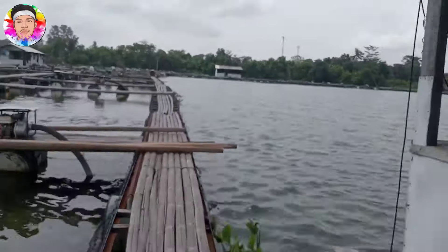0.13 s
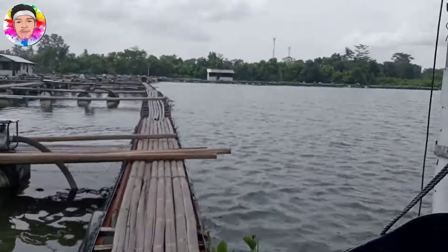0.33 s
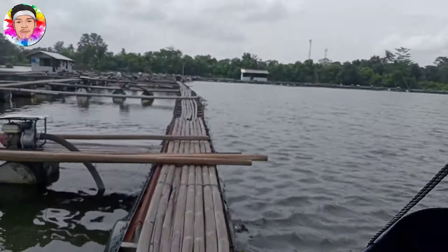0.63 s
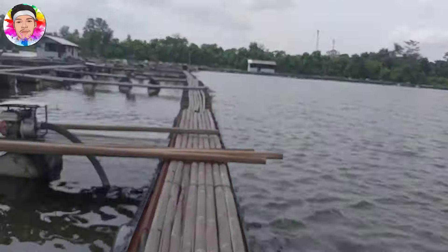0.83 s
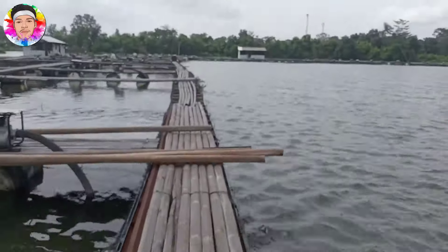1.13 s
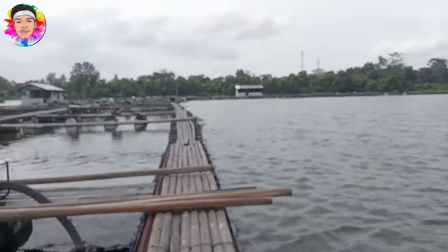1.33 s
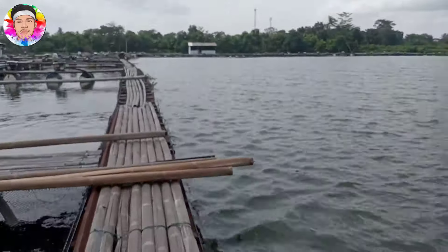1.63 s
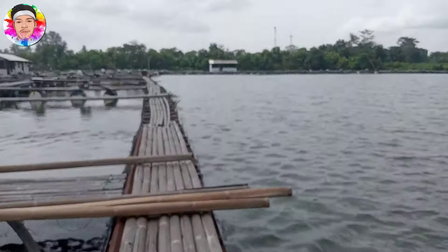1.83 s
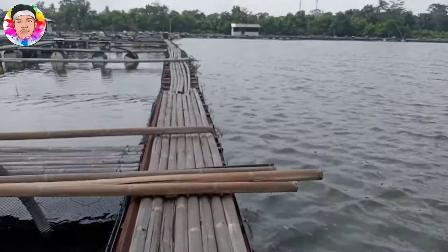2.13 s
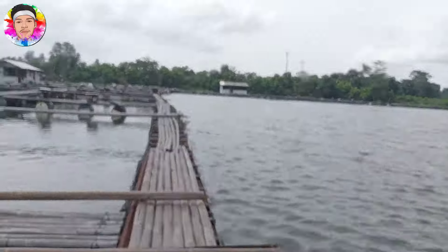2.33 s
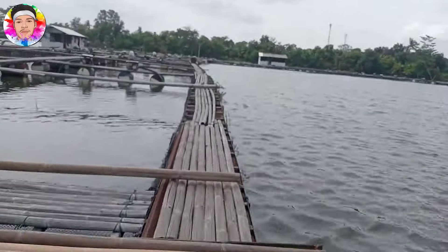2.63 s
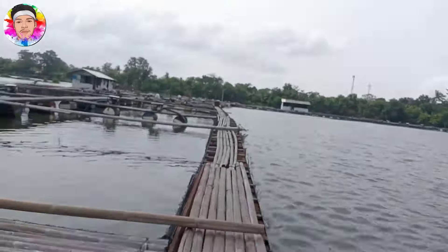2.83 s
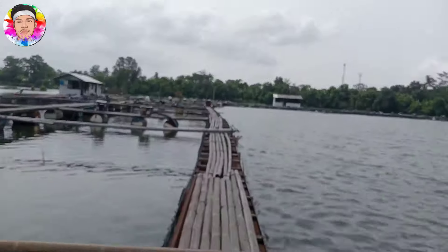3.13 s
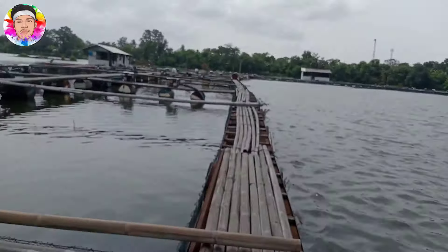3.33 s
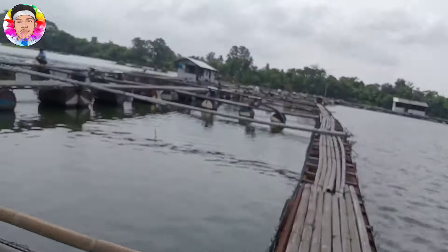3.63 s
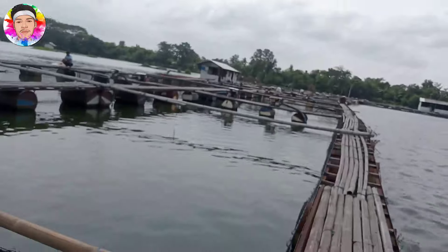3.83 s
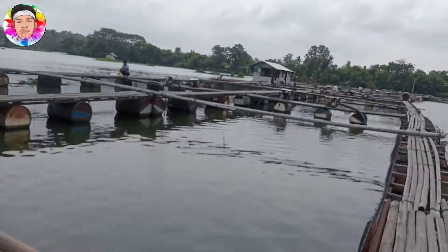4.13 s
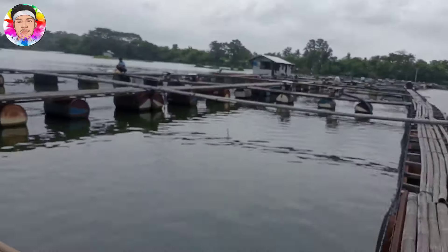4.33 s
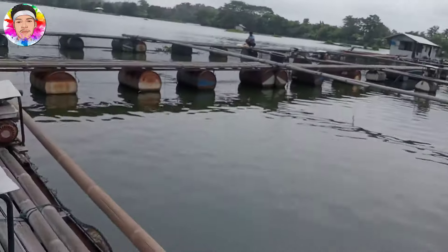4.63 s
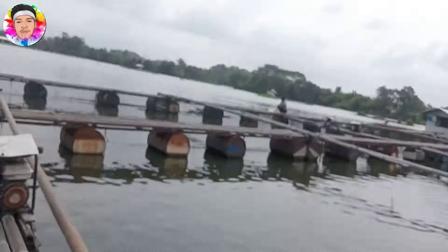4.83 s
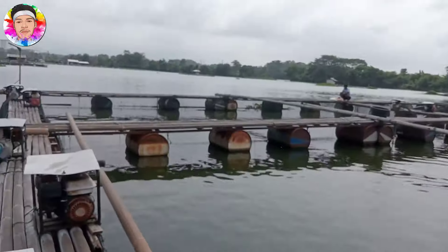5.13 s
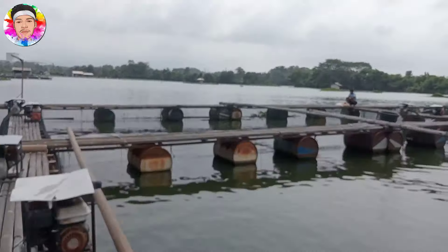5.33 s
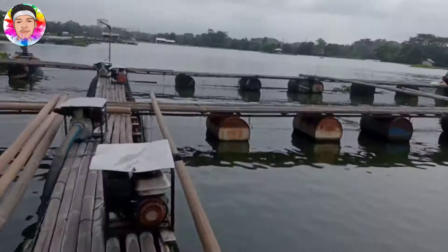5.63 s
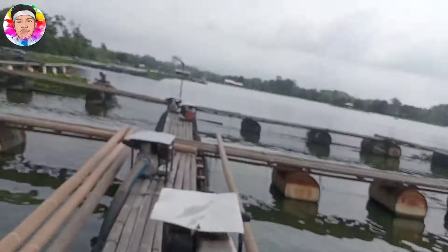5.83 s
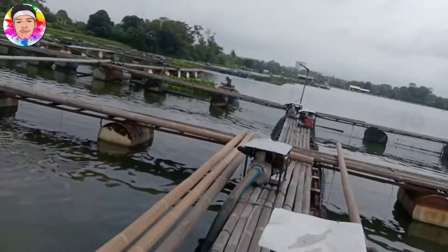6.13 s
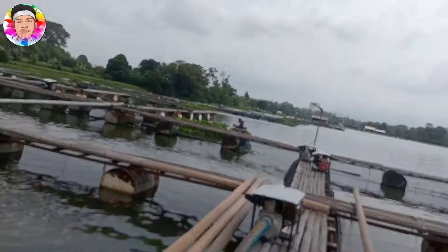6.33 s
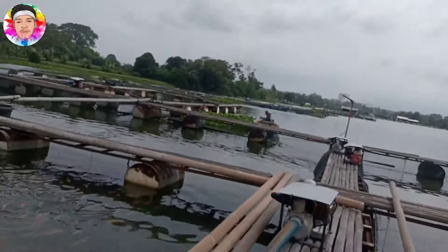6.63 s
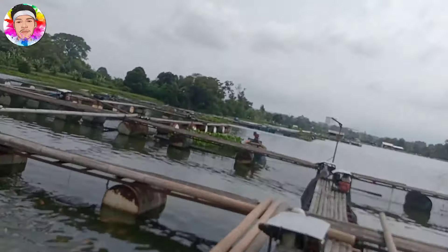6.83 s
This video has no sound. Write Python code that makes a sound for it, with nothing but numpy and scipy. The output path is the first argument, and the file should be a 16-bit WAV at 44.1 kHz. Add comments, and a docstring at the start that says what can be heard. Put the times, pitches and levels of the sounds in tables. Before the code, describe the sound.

Loose bamboo slats clatter under walking feet on an open lake, heard close and dry with no room echo. Each stride is a cluster of short hollow knocks with rubbing, crackling fibres and occasional sharp snaps or tiny squeaks. Low wind buffets the microphone, and a soft two-tone hum swells faintly around three to four seconds. Steps peak midway through, then become lighter and sparser until the end.

```python
"""A walk along a floating walkway of loose bamboo slats on a lake, about 7 s.
From the start footfalls clatter slats, soles scuff, dry canes snap, the deck rattles and rubs, and now and
then a cane squeaks: ringing contacts, grit, dispersed clicks and noise bursts. Wind buffets the microphone
and the lake washes softly: shaped noise. Hard steps land near 1 s; from 2.6 s a lashing creaks in stick-slip
pulses, from 2.9 to 3.9 s a low two-tone drone sounds, and near 4.5 s come the loudest knocks."""
import sys
import numpy as np
from scipy import signal
from scipy.fft import rfft, irfft, next_fast_len
from scipy.io import wavfile
from scipy.ndimage import uniform_filter1d, map_coordinates

SR = 44100
rng = np.random.default_rng(int(sys.argv[2]) if len(sys.argv) > 2 else 0)


def transcribe(signal):
    """Save signal, clipped to [-1, 1], as a 16-bit WAV file at the path in sys.argv[1]."""
    frames = np.atleast_2d(signal).T
    limited = np.clip(frames, -1, 1)
    pcm = np.round(limited * 32767).astype(np.int16)
    wavfile.write(sys.argv[1], SR, pcm)


N = 308567

# relative spectrum of knocking slats: [f/Hz, density/dB]
SLAT_SPECTRUM = [(60, -30.5), (150, -1.5), (300, -0.5), (500, -2), (780, 0), (1000, -3), (1300, -3.5),
                 (2000, -36), (4000, -33.5), (8000, -77)]


def footfalls(pitch_spread=0.34, cycles=1.44, scatter_db=2, scrape_trim_db=-1,
              rise_power=1.3, fall_power=0.89, firm_db=1, count=80):
    """Each blow passes from slat to slat, a contact every few ms, while the sole scrapes the canes."""
    # slats knocked underfoot: [peak t/s, level/dB, rise/s, fall/s, f/Hz, scrape re knock before trim/dB]
    knock_rows = [(0.08, -15.5, 0.009, 0.013, 498, -25), (0.2, -20.5, 0.012, 0.021, 474, -12),
                  (0.257, -18, 0.024, 0.025, 278, -13.5), (0.345, -22.5, 0.0037, 0.014, 620, -15.5),
                  (0.518, -16.5, .005, 0.084, 515, -12), (0.612, -12, 0.011, 0.012, 540, -12.5),
                  (0.962, -7, 0.0053, 0.0095, 500, -14), (0.98, -4.5, 0.0076, 0.017, 387, -24.5),
                  (1.033, -14.5, 0.013, 0.016, 448, -16.5), (1.176, -22, .01, .035, 450, -19),
                  (1.434, -8.5, 0.0074, 0.036, 414, -16.5), (1.863, -16.5, .003, 0.0075, 350, -21),
                  (1.9, -18.5, .004, 0.057, 456, -7), (1.942, -10, 0.014, 0.023, 418, -29.5),
                  (2.401, -16, 0.012, 0.016, 425, -25.5), (2.57, -15.5, .001, 0.026, 426, -13.5),
                  (2.702, -19.5, 0.0022, 0.0054, 336, -20), (2.842, -8, 0.014, 0.011, 482, -22.5),
                  (3.227, -21, 0.0036, 0.038, 580, -6), (3.289, -8.5, 0.0092, 0.012, 542, -12.5),
                  (3.325, -15.5, 0.016, 0.0056, 495, -25), (3.365, -18.5, 0.0019, 0.013, 836, -16),
                  (3.382, -14.5, 0.0071, 0.025, 502, -18), (3.519, -25, 0.021, 0.016, 330, -10.5),
                  (3.818, -17.5, 0.022, 0.012, 526, -14.5), (3.857, -11, 0.0052, 0.0077, 395, -22.5),
                  (3.913, -18.5, 0.003, 0.013, 467, -15), (3.967, -22, 0.0026, 0.026, 508, -16),
                  (4.236, -22.5, 0.0071, 0.0078, 497, -12.5), (4.32, -16.5, 0.022, 0.03, 510, -20.5),
                  (4.391, -13, 0.0026, 0.003, 480, -23), (4.468, -13.5, .003, 0.018, 540, -11),
                  (4.503, -3, 0.005, 0.0031, 300, -20), (4.509, -5, .0025, 0.0058, 723, -24),
                  (4.586, -24, 0.0034, 0.014, 462, -44), (4.813, -13, 0.0013, 0.0062, 720, -53),
                  (4.854, -24.5, 0.0075, 0.0091, 520, -8), (4.879, -26, 0.016, .008, 734, -9.5),
                  (5.03, -16.5, 0.011, 0.0028, 670, -16.5), (5.456, -28, 0.0042, 0.0071, 630, -5),
                  (5.575, -21.5, 0.024, 0.014, 391, -20), (5.931, -13, 0.003, 0.035, 559, -15.5),
                  (6.011, -19.5, 0.011, 0.022, 304, -11), (6.084, -22, .005, 0.0061, 630, -31),
                  (6.416, -16.5, 0.007, 0.031, 361, -28), (6.476, -23.5, 0.01, .022, 344, -21.5),
                  (6.597, -21.5, 0.015, .035, 412, -14)]
    wood, scrape_power = np.zeros(N), np.zeros(N)
    lead_s, length_s = 0.06, 0.18
    t = np.arange(round(length_s * SR)) / SR - lead_s
    for peak_s, db, rise_s, fall_s, hz, sole_db in knock_rows:

        def load(t):
            """Foot load, 1 at t = 0, with stretched-exponential flanks."""
            rising = np.abs(t / rise_s) ** rise_power
            falling = np.abs(t / fall_s) ** fall_power
            return np.exp(-np.where(t < 0, rising, falling))

        at = (np.arange(count) + rng.uniform(-0.55, 0.65, count)) * length_s / count - lead_s
        pitch = hz * np.exp(pitch_spread * np.clip(rng.standard_normal(count), -2, 1.5))
        signs = rng.choice([-1, 1], count)
        sizes = load(at) * amp(scatter_db * rng.standard_normal(count)) * signs
        # the slat right under the foot takes a firm contact
        main = np.abs(at).argmin()
        at[main], pitch[main], sizes[main] = 0, hz, amp(firm_db)
        # low slats ring longer, so for the same energy they swing less
        clatter = rings(len(t), at + lead_s - 1 / pitch, pitch, sizes * np.sqrt(pitch), cycles)
        load_rms = np.sqrt(np.mean(load(t) ** 2))
        add(wood, peak_s - lead_s, amp(db) * load_rms * coloured(clatter, SLAT_SPECTRUM))
        scrape = amp(db + sole_db + scrape_trim_db) * load(t)
        add(scrape_power, peak_s - lead_s, scrape ** 2)
    sole = grit(noise_db=-1, scatter_db=4, cycles=2.2)
    return wood + np.sqrt(scrape_power) * sole


def snaps(width=0.54, splinter=0.86, size=2048):
    """A cane cracks; bending waves carry highs ahead of lows, so the click is a very short falling chirp."""
    # snaps: [t/s, level as rms over 4 ms/dB, dispersion spread/s]
    snap_rows = [(0.0757, -24.5, .0024), (0.1182, -25.5, .0005), (0.9574, -22, 0.0023),
                 (1.031, -32.5, .0013), (1.5296, -23.5, .0005), (2.6987, -33, 0.00064),
                 (2.9133, -32.5, .0012), (2.9242, -37, 0.0011), (2.942, -26.5, .0013), (3.033, -35, .0007),
                 (3.2763, -22.5, .0016), (3.378, -23.5, .0014), (3.4063, -16, .0018),
                 (3.7773, -35.5, 0.00033), (3.91, -27.5, .0022), (3.9664, -38, 0.0023),
                 (4.3785, -28, .0009), (4.3915, -18, .002), (4.4267, -22.5, .0005), (4.4657, -27.5, .0016),
                 (4.483, -25, .0009), (4.5089, -25.5, .001), (4.5472, -26, .0005), (5.2202, -39, .0015),
                 (5.5484, -36.5, .0006), (5.9296, -30.5, .0021), (6.0223, -26.5, .0009),
                 (6.1883, -35, .001), (6.5336, -33.5, 0.0013)]
    # relative cane response: [f/Hz, gain/dB]
    cane_response = [(300, -32), (900, 3.5), (2000, -0.5), (3200, -4.5), (4400, 0.5), (5500, -11.5),
                     (6800, -17), (8000, -25), (10000, -14), (15500, -12)]
    ref_hz, ref_spread_s, drop_power = 2098, 0.00075, 0.16  # longer snaps are lower
    lead_s, level_span_s, splinter_span = 0.01, 0.004, 1.3
    out = np.zeros(N)
    f = np.fft.rfftfreq(size, 1 / SR) + 1
    t = np.arange(size) / SR
    for snap_s, db, spread_s in snap_rows:
        hz = ref_hz * (ref_spread_s / spread_s) ** drop_power
        life_s = splinter_span * spread_s + 1 / SR
        fibres = rng.standard_normal(size) * np.exp(-t / life_s)
        source = splinter * fibres / np.sqrt(life_s * SR / 2)
        source[0] = 1  # the break itself, ahead of the splintering fibres
        band = gain(cane_response, f) * np.exp(-0.5 * (np.log(f / hz) / width) ** 2)
        delay_phase = 2 * np.pi * (f * lead_s + 2 * spread_s * (2 * np.sqrt(f * hz) - f))
        click = irfft(rfft(source) * band * np.exp(-1j * delay_phase))
        level = amp(db) * np.sqrt(level_span_s * SR)
        add(out, snap_s - lead_s, level * click / np.linalg.norm(click))
    return out


def deck(rattle_hz=470, pitch_spread=0.4485, cycles=3.74, scatter_db=2.5, uneven_db=2, count=3200):
    """With every stride the loose slats jostle and the lashed canes rub and crackle."""
    # walker's weight comes on: [t/s, rattle level/dB, scuff level/dB, length re usual stride]
    stride_rows = [(0.23, -37, -46.5, 2.7), (0.6, -27, -39.5, 1.23), (1.1, -22, -39, 1.15),
                   (1.521, -30, -42, 1.7), (2.03, -33, -44, 3.9), (2.518, -28.5, -39.5, 3.4),
                   (2.899, -27.5, -38, 1.3), (3.35, -30.5, -42, 1.7), (3.771, -26, -38, 0.82),
                   (4.001, -33.5, -40.5, 0.88), (4.398, -18, -33, 0.55), (5.038, -21.5, -39.5, 0.76),
                   (5.601, -27.5, -49, 1), (6.13, -24, -38, 0.33), (6.56, -32, -47, 2.4)]
    load_db_per_s, settle_db_per_s = 90, 71.5
    grip_db_per_s, release_db_per_s = 56.5, 64.5
    idle_rattle_db, idle_rub_db = -44, -64  # the floating deck never lies quite still
    stride_s, rattle_db, scuff_db, lengths = np.transpose(stride_rows)
    jostling = swells(stride_s, rattle_db, load_db_per_s, settle_db_per_s, lengths)
    jostling = np.hypot(amp(idle_rattle_db), jostling)
    rubbing = swells(stride_s, scuff_db, grip_db_per_s, release_db_per_s, lengths)
    rubbing = np.hypot(amp(idle_rub_db), rubbing)

    at = rng.uniform(0, N / SR, count)
    pitch = rattle_hz * np.exp(pitch_spread * rng.standard_normal(count))
    sizes = amp(scatter_db * rng.standard_normal(count)) * rng.choice([-1, 1], count)
    contacts = coloured(rings(N, at, pitch, sizes, cycles), SLAT_SPECTRUM)
    rattle = unit(contacts * amp(uneven_db * wobble(28)))
    rub = unit(grit(noise_db=1.5, scatter_db=6.0, cycles=8.4) * amp(4.7 * wobble(45)))
    return jostling * rattle + rubbing * (rub + crackle())


def grit(noise_db, scatter_db, cycles, count=5000):
    """Dry friction: tiny slips, each ringing a cane at its own pitch, over an uneven hiss."""
    # relative scuff spectrum: [f/Hz, density/dB]
    scuff_spectrum = [(400, -23), (900, 4.5), (1300, -1), (1850, -1.5), (2500, -8.5), (3100, -12),
                      (3900, -10), (4500, -16.5), (5300, -27), (6500, -31), (7800, -41.5), (9500, -37.5),
                      (12000, -45), (15500, -57.5)]
    pitch = rng.uniform(800, 5200, count)
    sizes = amp(scatter_db * np.clip(rng.standard_normal(count), -2, 2)) * pitch ** 0.7
    slips = rings(N, rng.uniform(0, N / SR, count), pitch, sizes, cycles, size=700)
    hiss = rng.standard_normal(N) * amp(0.85 * wobble(210))
    mix = coloured(slips, scuff_spectrum) + amp(noise_db) * coloured(hiss, scuff_spectrum)
    return patchy(mix, depth_db=3.5)


def crackle(level_db=-18, scatter_db=4.5, count=420):
    """Dry fibres tick at random as the canes rub; level is relative to the rub."""
    # relative crackle spectrum: [f/Hz, density/dB]
    crackle_spectrum = [(1000, -11), (2500, 14), (4500, 6.5), (6000, -1), (7800, -13), (9500, -11),
                        (12500, -12), (15500, -6)]
    sizes = amp(scatter_db * np.clip(rng.standard_normal(count), -2, 2))
    train = pulses(rng.uniform(0, N / SR, count), sizes)
    return amp(level_db) * coloured(train, crackle_spectrum)


def squeaks(flutter_db=3, width=0.11):
    """A cane sliding on its neighbour sings briefly and unsteadily in a narrow band."""
    # squeaks: [centre t/s, level before flutter/dB, half length/s, f/Hz]
    squeak_rows = [(0.347, -38.5, 0.005, 2030), (0.76, -52, 0.073, 3600), (1.422, -34.5, .0065, 1970),
                   (2.122, -39, 0.013, 2220), (3.912, -19, 0.0014, 1890), (4.319, -24, 0.0019, 1900),
                   (4.502, -35, 0.0023, 1100), (5.805, -36, 0.0071, 1850), (5.934, -34, 0.0082, 2090),
                   (6.76, -47, .009, 2420)]
    out = np.zeros(N)
    for centre_s, db, half_s, hz in squeak_rows:
        sound = burst(half_s, hz, width)
        add(out, centre_s - len(sound) / SR / 2, amp(db) * sound)
    return out * unit(amp(flutter_db * wobble(70)))


def creak(slips_per_s=75, count=640):
    """A lashing sticks and slips at an uneven rate whenever it is pulled."""
    # pulls: [t/s, level/dB, length re usual pull]
    pull_rows = [(2.611, -46, 1), (2.71, -39, .7), (2.914, -42, .6)]
    # relative spectrum of one slip: [f/Hz, density/dB]
    slip_spectrum = [(800, -21), (2000, -5), (2800, -14.5), (3700, -0.5), (4600, -13.5), (5600, -20),
                     (7500, -37), (10000, -35), (15500, -35)]
    tighten_db_per_s, slacken_db_per_s = 319, 195
    uneven, scatter_db = 0.25, 4
    at = np.cumsum(np.exp(uneven * rng.standard_normal(count))) / slips_per_s
    sizes = amp(scatter_db * np.clip(rng.standard_normal(count), -2, 2))
    train = coloured(pulses(at, sizes), slip_spectrum)
    pull_s, db, lengths = np.transpose(pull_rows)
    return swells(pull_s, db, tighten_db_per_s, slacken_db_per_s, lengths) * train


def ticks(life_s=0.001, size=256):
    """Tiny bright ticks, some the sharp top of a cane snap: white noise with a 1 ms exponential decay."""
    # ticks: [t/s, onset level/dB]
    tick_rows = [(1.46, -51.5), (3.035, -47.5), (3.521, -49), (4.024, -43), (4.39, -50), (4.509, -49),
                 (4.872, -50), (6.023, -39), (6.924, -45.5)]
    decay = np.exp(-np.arange(size) / SR / life_s)
    out = np.zeros(N)
    for tick_s, db in tick_rows:
        add(out, tick_s, amp(db) * rng.standard_normal(size) * decay)
    return out


def wind(trim_db=0.9, lumpy_db=3, buffet_trim_db=-1, width=0.47):
    """Turbulence rumbles on the microphone; single eddies thump it."""
    # rumble: [t/s, level before trim/dB]
    wind_rows = [(0, -29.5), (0.74, -24.5), (0.9, -30), (1.6, -25), (1.8, -30), (2.1, -30), (2.95, -29.5),
                 (3.12, -46), (3.27, -34), (3.9, -31), (4.46, -25), (4.7, -30), (5.1, -29.5), (5.36, -34.5),
                 (5.53, -26), (6.15, -30.5), (6.6, -27), (6.9, -35.5)]
    # relative rumble spectrum: [f/Hz, density/dB]
    rumble_spectrum = [(15, -42), (30, -27), (50, -12), (75, -1.5), (120, 1), (180, -3), (260, -11.5),
                       (450, -21), (900, -34), (2000, -65.5), (5000, -100)]
    # eddies: [centre t/s, level before trim/dB, half length/s, f/Hz]
    buffet_rows = [(0.687, -19, 0.034, 119), (0.765, -17, .032, 123), (1.09, -18.5, 0.016, 122),
                   (2.092, -18.5, 0.016, 159), (2.58, -18.5, .015, 134), (2.831, -21, 0.017, 115),
                   (4.181, -26, 0.019, 152), (4.425, -18, 0.04, 130), (4.779, -27, 0.0099, 123),
                   (5.179, -14.5, 0.0042, 133), (5.568, -12.5, 0.018, 107), (5.846, -21, 0.024, 148),
                   (5.957, -11, 0.006, 145), (6.28, -16, 0.0075, 131), (6.59, -21.5, 0.08, 100)]
    rumble = coloured(rng.standard_normal(N), rumble_spectrum)
    rumble = unit(rumble * amp(lumpy_db * wobble(22)))
    out = amp(curves(wind_rows)[0] + trim_db) * rumble
    for centre_s, db, half_s, hz in buffet_rows:
        eddy = burst(half_s, hz, width)
        add(out, centre_s - len(eddy) / SR / 2, amp(db + buffet_trim_db) * eddy)
    return out


def drone(waver=0.017, flutter_db=3):
    """Two low, slightly unsteady sine tones swell and fade."""
    # envelope, silent outside: [t/s, level/dB]
    drone_rows = [(2.88, -49), (2.98, -33), (3.15, -42), (3.32, -40.5), (3.47, -31), (3.73, -34),
                  (3.92, -51)]
    # tones: [mean f/Hz, level re envelope before flutter/dB]
    tone_rows = [(116, 3.7), (178, 1.5)]
    tones = np.zeros(N)
    for hz, db in tone_rows:
        phase = 2 * np.pi * np.cumsum(hz * (1 + waver * wobble(13))) / SR
        tones += amp(db + flutter_db * wobble(11)) * np.sin(phase)
    level_db = np.interp(np.arange(N) / SR, *np.transpose(drone_rows), left=-np.inf, right=-np.inf)
    level = uniform_filter1d(amp(level_db), size=1024)
    return level * np.sqrt(2) * tones


def lake(level_db=-50.0):
    """The soft, uneven wash of ripples and open air: shaped noise with a wandering level."""
    # relative wash spectrum: [f/Hz, density/dB]
    air_spectrum = [(100, -23), (400, -2), (1000, -1), (2000, -11), (4000, -15), (5500, -29.5),
                    (7500, -42.5), (15500, -45.5)]
    lapping_db = 1.5 * wobble(12)
    return amp(level_db + lapping_db) * coloured(rng.standard_normal(N), air_spectrum)


def amp(db):
    """dB to amplitude."""
    return 10 ** (np.asarray(db) / 20)


def unit(x):
    """x at rms 1."""
    return x / np.sqrt(np.mean(x ** 2) + 1e-20)


def gain(points, hz):
    """Gain of (Hz, dB) points on a log axis."""
    f, db = np.transpose(points)
    return amp(np.interp(np.log(hz + 1), np.log(f + 1), db))


def curves(rows):
    """One value per sample for each column after the time."""
    s, *cols = np.transpose(rows)
    return [np.interp(np.arange(N) / SR, s, c) for c in cols]


def wobble(knots_per_s):
    """A smooth random curve through normally distributed knots."""
    return map_coordinates(rng.standard_normal(2048), [np.arange(N) * knots_per_s / SR], mode="wrap")


def filtered(x, response):
    """x times a response of frequency."""
    m = next_fast_len(len(x) + 4096)
    return irfft(rfft(x, m) * response(np.fft.rfftfreq(m, 1 / SR)), m)[:len(x)]


def coloured(x, points):
    """x shaped by (Hz, dB) points, at rms 1."""
    return unit(filtered(x, lambda hz: gain(points, hz)))


def add(track, s, sound):
    """Mix a sound into the track from time s, cropped to the track."""
    i = round(s * SR)
    part = sound[max(-i, 0):max(len(track) - i, 0)]
    track[max(i, 0):][:len(part)] += part


def rings(n, at, hz, sizes, cycles, attack=0.18, size=1200):
    """n samples of contacts: sines that rise within a cycle and decay over the given cycles."""
    t = np.arange(size) / SR
    turns = t * hz[:, None]
    envelope = (1 - np.exp(-turns / attack)) ** 2 * np.exp(-turns / cycles)
    waves = sizes[:, None] * envelope * np.sin(2 * np.pi * turns)
    index = np.maximum(at * SR, 0).astype(int)[:, None] + np.arange(size)
    return np.bincount(index.ravel(), waves.ravel(), n)[:n]


def pulses(at, sizes):
    """Single-sample impulses at the given times."""
    return np.bincount(np.clip(at * SR, 0, N).astype(int), sizes, N + 1)[:N]


def burst(half_s, hz, width, size=32768):
    """A Gaussian swell of narrow noise around hz, centred in its window, with rms about 1 at its crest."""
    swell = np.exp(-0.5 * ((np.arange(size) - size / 2) / SR / half_s) ** 2)
    noise = rng.standard_normal(size)
    band = filtered(noise, lambda f: np.exp(-0.5 * (np.log((f + 1) / hz) / width) ** 2))
    return np.sqrt(np.mean(swell ** 2)) * unit(band * swell)


def patchy(x, depth_db, size=512):
    """Shifting contacts favour ever new bands: random gain patches some 260 Hz wide and 30 ms long."""
    z = signal.stft(x, nperseg=size)[2]
    field = uniform_filter1d(rng.standard_normal(z.shape), size=3, axis=0)
    field = uniform_filter1d(field, size=5, axis=1)
    return unit(signal.istft(z * amp(depth_db * unit(field)), nperseg=size)[1][:N])


def swells(times, levels_db, rise_db_per_s, fall_db_per_s, lengths):
    """A gain that climbs to each level at its time and dies away; slopes are divided by the lengths."""
    late = (np.arange(N)[:, None] / SR - times) / lengths
    drop_db = np.maximum(-rise_db_per_s * late, fall_db_per_s * late)
    return amp((levels_db - drop_db).max(axis=1))


def scene():
    """The walkway under the feet, with wind, drone and lake around it."""
    walkway = footfalls() + snaps() + deck() + squeaks() + creak() + ticks()
    return (walkway + wind() + drone() + lake())[None]


def record(dry):
    """The camera rounds off the loudest peaks and keeps nothing above its band limit."""
    top_hz = 15830
    held = dry[0] / (1 + np.abs(dry[0]) ** 8) ** (1 / 8)
    return filtered(held, lambda hz: hz < top_hz)[None]


dry = scene()
out = record(dry)
transcribe(out)
```